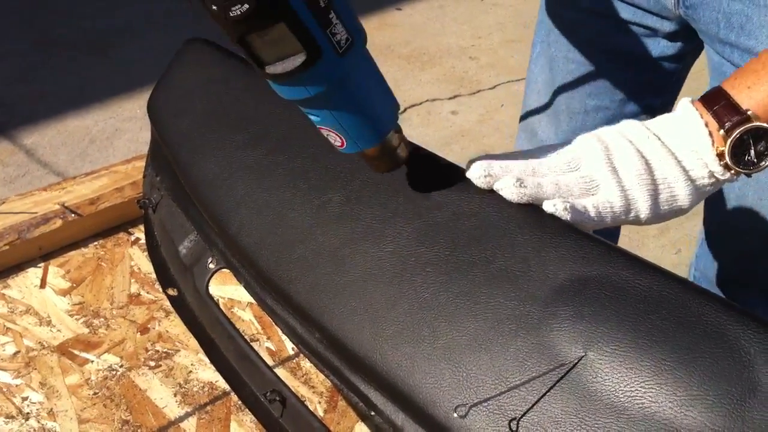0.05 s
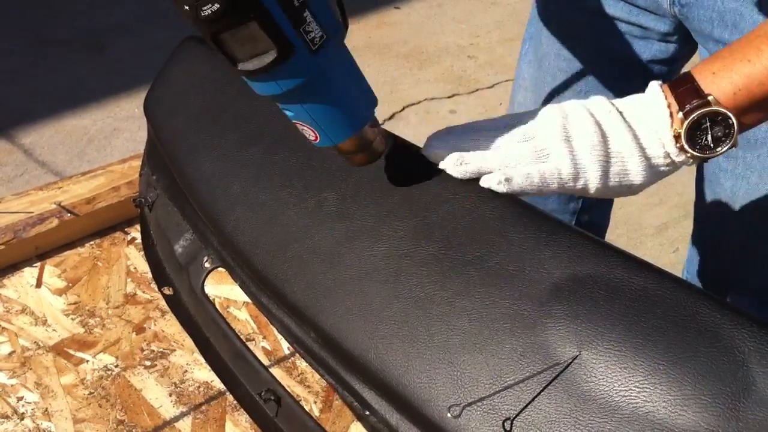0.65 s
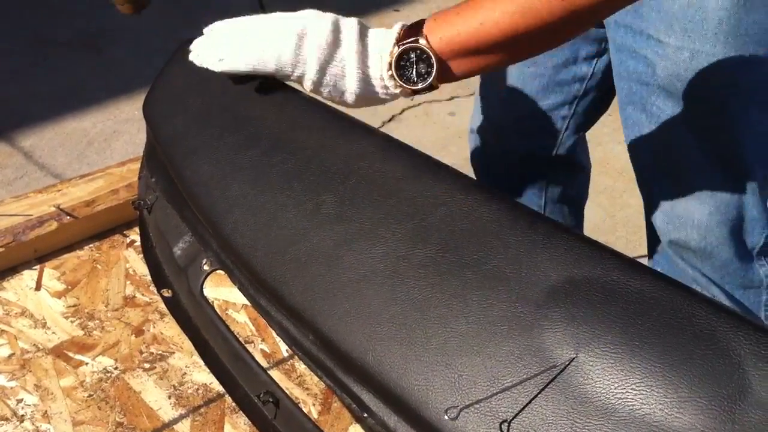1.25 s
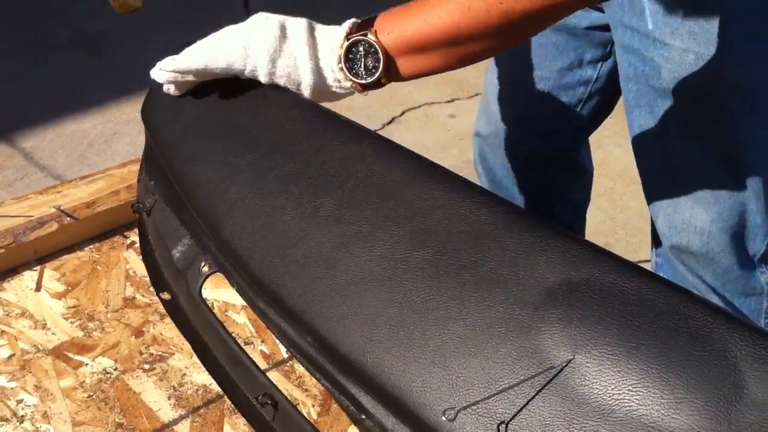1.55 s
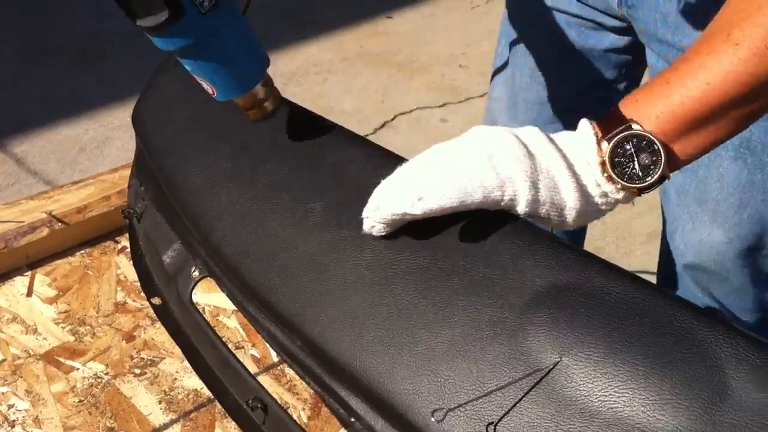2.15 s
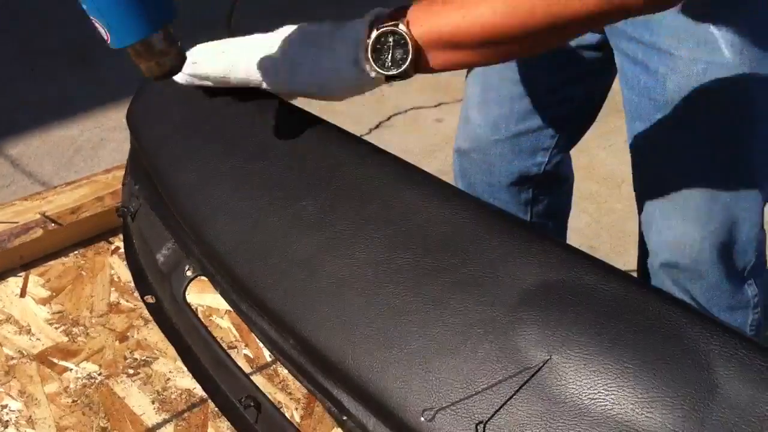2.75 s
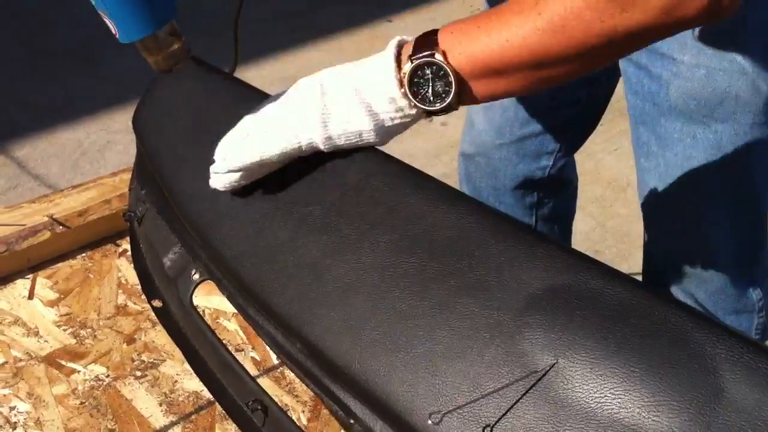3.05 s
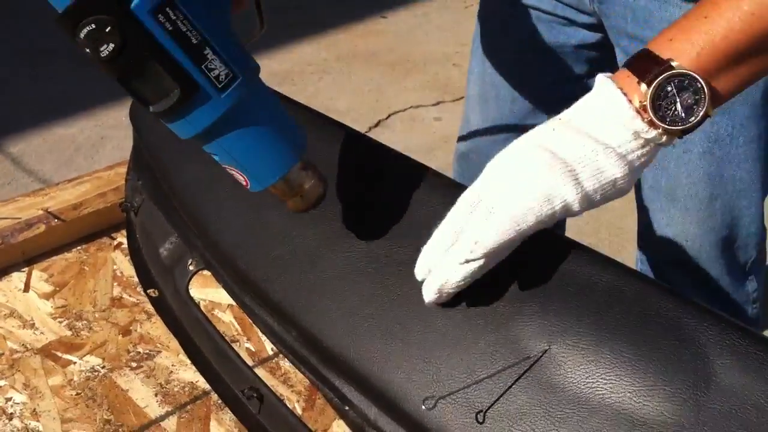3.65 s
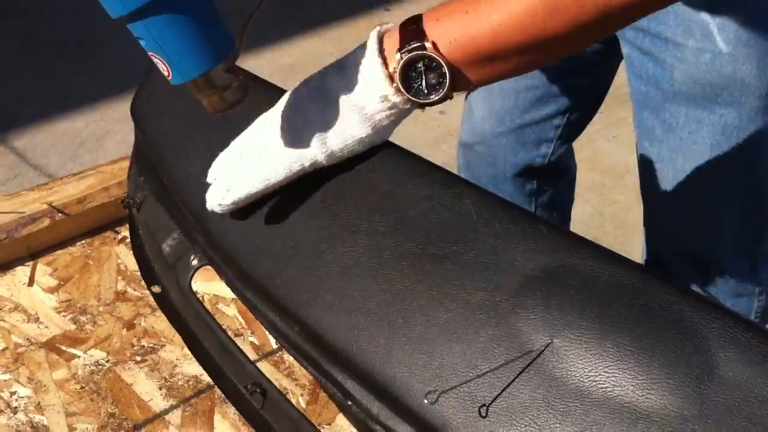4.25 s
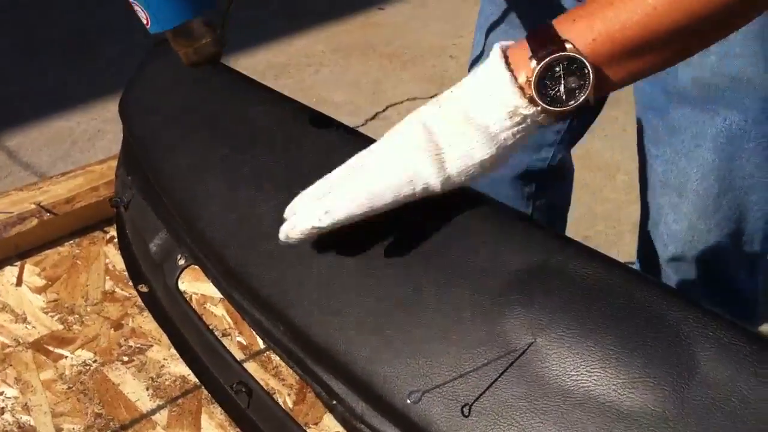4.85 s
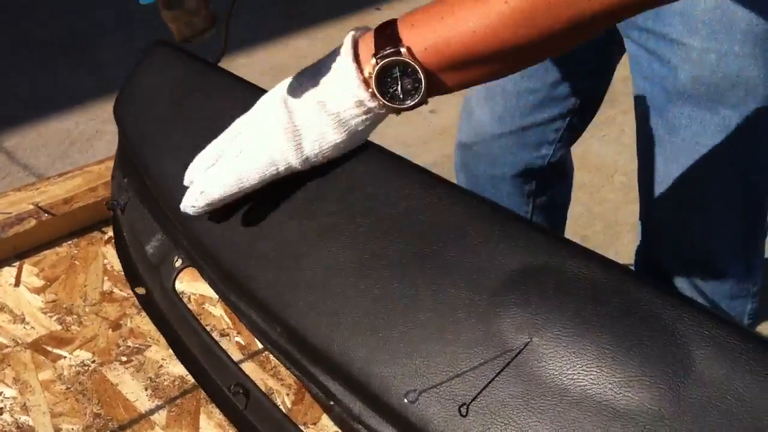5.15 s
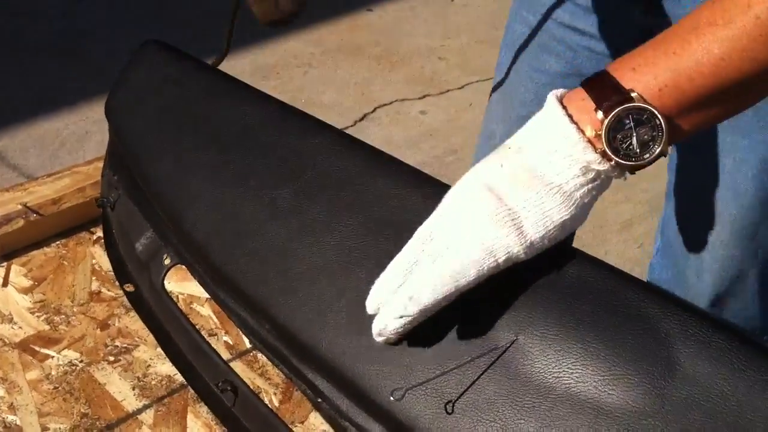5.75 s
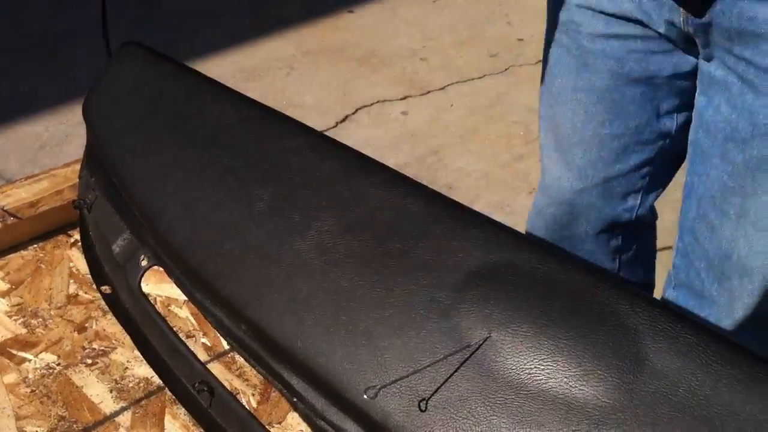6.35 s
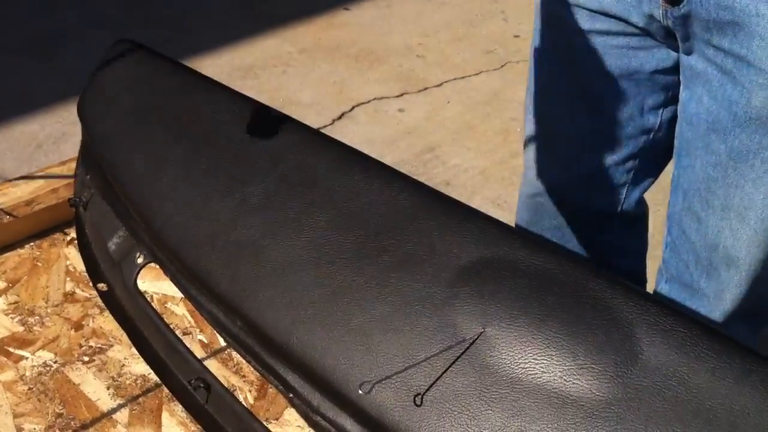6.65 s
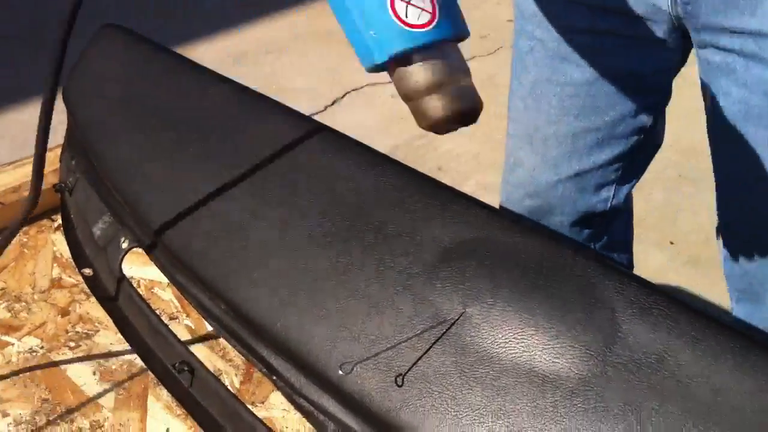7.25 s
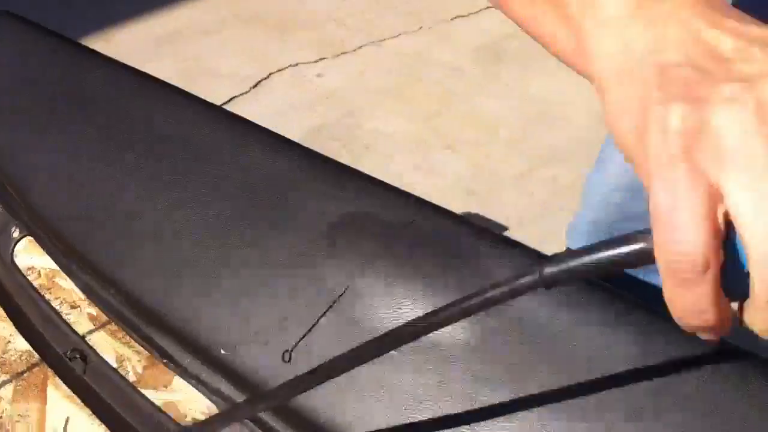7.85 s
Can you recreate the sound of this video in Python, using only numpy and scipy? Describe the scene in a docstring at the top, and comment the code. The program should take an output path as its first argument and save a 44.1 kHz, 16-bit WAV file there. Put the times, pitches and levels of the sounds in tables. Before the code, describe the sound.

A handheld electric heat gun runs close to the microphone, blowing a continuous hiss of air with a thin, wavering fan whine. The rush shifts gently in tone as it sweeps over a padded vinyl panel, above a faint outdoor rumble. Near the end it swings closer and gets louder, a brief rattling bump and small squeak come from the bench, and the airflow rises in pitch.

```python
"""An electric heat gun is swept over a padded vinyl panel, close up, over a low outdoor rumble.
At first the jet spatters off the panel's edge. Throughout, the fan whines and stirs the gun's cavities,
the nozzle hisses, and short echoes off nearby surfaces colour the moving rush. At 6.7 s the gun swings
closer; at 7.3 s something bumps the bench and squeaks. Last, a hand closes on the gun and the rush
rises in colour."""
import sys
import numpy as np
from scipy import signal
from scipy.fft import rfft, irfft, next_fast_len
from scipy.io import wavfile
from scipy.ndimage import uniform_filter1d, map_coordinates

SR = 44100
rng = np.random.default_rng(int(sys.argv[2]) if len(sys.argv) > 2 else 0)


def unload_wav(signal):
    """Save mono or channel-first audio to the path in sys.argv[1] as 16-bit WAV at rate SR, clipped to [-1, 1]."""
    wavfile.write(
        sys.argv[1],
        SR,
        np.round(np.clip(np.atleast_2d(signal).T, -1, 1) * 32767).astype(np.int16),
    )


N = 353241
TIME = np.arange(N) / SR
FREQ = np.maximum(np.fft.rfftfreq(next_fast_len(N, True), 1 / SR), 1)


def undb(db):
    """Decibels to gain."""
    return 10 ** (np.asarray(db) / 20)


def curves(table):
    """Each column of a timed table, at every sample."""
    times_s, *columns = np.transpose(table)
    return [np.interp(TIME, times_s, column) for column in columns]


def envelope(start_s, attack_s, hold_s, release_s):
    """Trapezoid, 0 to 1 and back; each *_ENV_S lists these four times."""
    return np.interp(TIME, start_s + np.cumsum([0, attack_s, hold_s, release_s]), [0, 1, 1, 0])


def walk(rate_hz):
    """Smoothed random steps, spread near 1."""
    step = max(int(SR / rate_hz), 1)
    held = np.repeat(rng.standard_normal(N // step + 1), step)
    return 4 / 3 * uniform_filter1d(uniform_filter1d(held, step), step)[:N]


def slope(points):
    """Spectral gain through (f/Hz, level/dB) points."""
    hz, db = np.transpose(points)
    return undb(np.interp(np.log(FREQ), np.log(hz), db))


def resonances(modes):
    """Spectral gain of steep-sided resonances; powers add."""
    gains = (undb(db) / (1 + ((FREQ - hz ** 2 / FREQ) / width_hz) ** 2) for hz, width_hz, db in modes)
    return np.sqrt(sum(gain ** 2 for gain in gains))


def noise(gain):
    """Turbulence of the given colour, rms 1."""
    white = rng.standard_normal(2 * (len(FREQ) - 1))
    coloured = irfft(rfft(white) * gain)[:N]
    return coloured / coloured.std()


def lowpass(x, hz):
    """Gentle zero-phase low-pass."""
    return signal.sosfiltfilt(signal.butter(2, hz, fs=SR, output="sos"), x)


def delayed(x, delay_ms):
    """Sound after a path of changing length."""
    return map_coordinates(x, [(TIME - delay_ms / 1000) * SR], order=3)


# rumble spectrum: f/Hz, relative level/dB
RUMBLE_SPECTRUM = [(20, -22), (40, -33), (62, -22), (85, -10), (100, -9.5), (125, -0.5), (165, 3.5),
                   (230, 1), (330, 0), (600, -12.5), (2000, -29), (16000, -36)]
# drone bands: f/Hz, width/Hz, relative level/dB
DRONE_BANDS = [(254, 16, -2), (393, 20, 0), (470, 20, -4)]
RUMBLE_SWELL_ENV_S = (3.3, 2, 0.49, 0.4)


def yard(rumble_db=-51.5, swell_db=3, waver_db=0.4, drone_db=-60):
    """Outdoor rumble with one slow swell and a faint unsteady drone."""
    level_db = rumble_db + swell_db * envelope(*RUMBLE_SWELL_ENV_S) + waver_db * walk(5)
    rumble = noise(slope(RUMBLE_SPECTRUM)) * undb(level_db)
    return rumble + noise(resonances(DRONE_BANDS)) * undb(drone_db)


# bump and rattle: t/s, relative level/dB, contact/ms
CONTACTS = [(7.304, -8, .4), (7.334, -2, 0.087), (7.337, 2.5, 0.083), (7.3413, 3.5, 0.5), (7.357, -2, 0.29),
            (7.367, 0.5, 0.6), (7.388, -4.5, 1.1), (7.406, -5, 1)]
# bench and panel modes: f/Hz, t60/s, relative level/dB
BENCH_MODES = [(134.4, 0.14, -9), (166, 0.13, -5.5), (245, 0.16, -7.5), (324, 0.074, -6), (407, 0.16, -7),
               (480, 0.09, -2.5), (570, 0.047, 2.5), (644, 0.026, 2), (790, 0.048, 0.5), (1062, 0.04, 4),
               (1200, 0.026, 4.5), (1500, 0.033, 1.5), (1850, 0.022, 4), (2300, 0.02, 1.5),
               (2850, 0.013, 8)]


def bump(ring_db=-28, scuff_db=-31, scuff_t60_s=0.07, scuff_hz=1800, low_cut_hz=110):
    """Each contact rings the bench and scuffs; longer contacts are duller."""
    t = np.arange(SR // 2) / SR
    out = np.zeros(N + 2 * len(t))
    for start_s, db, contact_ms in CONTACTS:
        weights = rng.uniform(.6, 1.4, len(BENCH_MODES))
        ring = 0
        for k, (hz, t60_s, mode_db) in enumerate(BENCH_MODES):
            decay = undb(mode_db - 60 * t / t60_s)
            ring = ring + (-1) ** k * weights[k] * decay * np.sin(2 * np.pi * hz * t)
        scuff = lowpass(rng.standard_normal(len(t)), scuff_hz) * undb(-60 * t / scuff_t60_s)
        response = undb(ring_db) * ring + undb(scuff_db) * scuff
        force = np.exp(-np.pi * 1000 * t / contact_ms)
        blow = signal.fftconvolve(response, force / force.sum())[:len(t)]
        start = int(start_s * SR)
        out[start:start + len(t)] += undb(db) * blow
    # deep bass is cut from the knocks
    return signal.sosfilt(signal.butter(4, low_cut_hz, "highpass", fs=SR, output="sos"), out[:N])


# slips: t/s, length/s, start f/Hz, middle f/Hz, end f/Hz, level/dB
SLIPS = [(7.3, 0.0346, 846, 1140, 1240, -32), (7.36, 0.075, 519, 410, 380, -36)]


def squeaks(roughness=0.0499, attack_share=0.14):
    """Something slips on the bumped panel: brief, uneven gliding tones."""
    out = 0
    for start_s, length_s, *glide_hz, db in SLIPS:
        progress = np.clip((TIME - start_s) / length_s, 0, 1)
        hz = np.interp(progress, [0, .5, 1], glide_hz) * (1 + roughness * walk(400))
        grip = np.minimum(progress / attack_share, 1) * np.sqrt(1 - progress)
        out = out + undb(db) * grip * np.sin(2 * np.pi * np.cumsum(hz) / SR)
    return np.sqrt(2) * out


# gap resonances: t/s, attack/s, hold/s, release/s, start f/Hz, rise/(Hz/s), width/Hz, level/dB
GAP_GLIDES = [(7.6, 0.22, .3, .1, 1300, 2150, 380, -40), (7.6, 0.3, .3, .1, 3400, 3000, 420, -42),
              (7.48, .06, .16, .07, 5200, 2300, 330, -43.5)]


def hand_gap():
    """Air rushes between hand and gun; the narrowing gap's resonances rise."""
    out = 0
    for start_s, *shape_s, start_hz, rise_hz_per_s, width_hz, db in GAP_GLIDES:
        hz = start_hz + rise_hz_per_s * np.maximum(TIME - start_s, 0)
        phase = 2 * np.pi * np.cumsum(hz) / SR
        band = 1 / (1 + (2 * FREQ / width_hz) ** 2)
        rush = noise(band) * np.cos(phase) + noise(band) * np.sin(phase)
        out = out + undb(db) * envelope(start_s, *shape_s) * rush
    return out


# air striking the panel: f/Hz, width/Hz, relative level/dB
SPLASH_BANDS = [(1680, 170, 9), (5160, 710, -3), (6320, 340, 1), (7200, 690, -1)]
SPLASH_ENV_S = (0.12, 0.2, 0.39, 0.16)


def splash(level_db=-39):
    """The jet spatters off the panel's edge with the nozzle held against it."""
    return noise(resonances(SPLASH_BANDS)) * undb(level_db) * envelope(*SPLASH_ENV_S)


# glove strokes toward the nozzle: t/s, half length/s, closeness/0-1
GLOVE_STROKES = [(2.706, 0.091, 1), (3.45, 0.44, 0.76), (3.85, 0.42, 0.76), (4.45, 0.27, 0.6),
                 (4.797, 0.22, 0.74), (5.53, 0.29, 0.76)]
GLOVE_ENV_S = (2.54, 0.16, 3.6, 1.25)


def glove_echo(x, far_ms=0.365, near_ms=0.27, near_share=0.35):
    """Each stroke shortens the echo's path and so strengthens it."""
    reach = sum(close * np.exp(-((TIME - at_s) / half_s) ** 2) for at_s, half_s, close in GLOVE_STROKES)
    delay_ms = far_ms + (near_ms - far_ms) * np.minimum(reach, 1)
    share = near_share * near_ms / delay_ms * envelope(*GLOVE_ENV_S)
    return share * delayed(x, delay_ms)


ARM_ENV_S = (7.4, 0.49, .6, .1)


def arm_echo(x, far_ms=0.588, near_ms=0.387, closing_ms_per_s=0.34, full_share=0.29, lag_turns=0.17):
    """Double bounce off the approaching arm; its roundness lags the phase each time."""
    elapsed_s = np.maximum(TIME - ARM_ENV_S[0], 0)
    delay_ms = np.maximum(far_ms - closing_ms_per_s * elapsed_s, near_ms)
    share = full_share * envelope(*ARM_ENV_S)
    analytic = signal.hilbert(x, next_fast_len(N))[:N]
    lag = np.exp(-2j * np.pi * lag_turns)
    return sum(share ** k * delayed((analytic * lag ** k).real, k * delay_ms) for k in (1, 2))


# panel reflection: t/s, delay/ms, share of direct sound
PANEL_PATH = [(0, 1.08, 0.12), (.75, 1.03, 0.15), (1, 0.77, 0.14), (1.25, 0.74, 0.23), (1.4, 0.74, .26),
              (1.8, 0.76, 0.25), (2.05, .8, .16), (2.25, 0.78, 0.07), (2.55, 1.04, 0.27), (2.8, 0.97, 0.1),
              (4.8, 1.04, 0.14), (5.15, 0.49, 0.092), (5.6, 0.43, 0.16), (5.95, 0.665, 0.38),
              (6.1, 0.59, .2), (6.33, 0.47, .22), (6.5, 0.74, 0.17), (7.1, 0.51, 0.056), (7.4, 0.84, 0.15),
              (7.7, 1.04, 0.072), (8, 1.63, 0.21)]


def reflections(rush, dull_hz=9500, body_ms=1.403, sway_ms=0.16, body_share=0.072):
    """Moving echoes off panel, swaying body, glove and arm: a gliding comb."""
    dulled = lowpass(rush, dull_hz)
    panel_ms, panel_share = curves(PANEL_PATH)
    panel = panel_share * delayed(dulled, panel_ms)
    body = body_share * delayed(dulled, body_ms + sway_ms * walk(3.3))
    return panel + body + glove_echo(dulled) + arm_echo(dulled)


# broadened fan-blade harmonics: f/Hz, width/Hz, relative level/dB
SWISH_BANDS = [(3720, 250, -2), (4780, 190, 1), (5800, 250, 1), (7060, 200, 6), (8660, 1300, -3),
               (9600, 250, 1), (10600, 900, -8), (11950, 700, -6), (12900, 700, -7), (14300, 600, -13)]
SWING_ENV_S = (6.74, 0.16, 0.17, 0.18)


def fan_swish(level_db=-39):
    """The fan's overtones, smeared into a breathy whistle as the gun swings past."""
    return noise(resonances(SWISH_BANDS)) * undb(level_db) * envelope(*SWING_ENV_S)


def lifted():
    """0 to 1 as the swing lifts the gun off the panel; it then stays closer."""
    start_s, attack_s = SWING_ENV_S[:2]
    return np.clip((TIME - start_s) / attack_s, 0, 1)


# motor lines: multiple of shaft speed
MOTOR_ORDERS = [1, 2, 3, 5, 7, 12, 35, 40]
# per motor line: level/dB before trim
MOTOR_DB = [-57.5, -63, -52.5, -51.5, -60, -57, -71, -72]
# blade whine as the intake turns: t/s, level/dB before trim
WHINE_DB = [(0, -46), (.7, -45.5), (1.05, -48), (1.35, -54), (2.2, -48.5), (2.5, -50), (2.72, -43),
            (3, -54), (3.15, -48), (3.4, -54), (4.25, -43.5), (4.7, -48.5), (5, -49), (5.3, -44.5),
            (5.75, -53.5), (6.03, -41.5), (6.25, -50), (6.6, -52), (7, -43.5), (7.2, -53), (7.4, -39.5),
            (7.55, -50), (7.67, -42), (7.8, -50), (8, -46)]
# whine overtones: multiple of shaft speed, relative level/dB
WHINE_OVERTONES = [(16, 0), (24, -6), (32, -15)]
# overtones' narrower beam: t/s, level/dB before trim
OVERTONE_DB = [(0, -49), (.3, -53), (.88, -49), (1.15, -52), (1.55, -53), (2, -56), (2.45, -48),
               (3.05, -50), (3.4, -58), (4.1, -46), (5, -54), (6.25, -53), (6.55, -56), (7.15, -45.5),
               (7.45, -52), (7.7, -55), (7.88, -48)]


def rotor(shaft_hz=298.5, blades=8, whine_trim_db=-2, overtone_trim_db=-1.5, motor_trim_db=-3.5,
          lift_db=5, beam_db=0.8, flicker_db=2, fade_db=2.5):
    """Shaft-locked tones: blade-pass whine and weaker motor lines."""
    # turbulent load: drift, wander, tremble
    speed_hz = shaft_hz * (1 + 0.0005 * walk(2) + 0.00075 * walk(25) + 0.002 * walk(200))
    turns = np.cumsum(speed_hz) / SR
    whine_db = curves(WHINE_DB)[0] + whine_trim_db
    overtone_db = curves(OVERTONE_DB)[0] + overtone_trim_db
    motor_gain_db = motor_trim_db + lift_db * lifted()
    whine = [(blades, whine_db)] + [(k, db + overtone_db) for k, db in WHINE_OVERTONES]
    lines = [(k, db + beam_db * walk(3.65) + flicker_db * walk(30)) for k, db in whine]
    lines += [(k, db + motor_gain_db + fade_db * walk(6)) for k, db in zip(MOTOR_ORDERS, MOTOR_DB)]
    return np.sqrt(2) * sum(undb(db) * np.sin(2 * np.pi * (k * turns + rng.random())) for k, db in lines)


# jet turbulence: f/Hz, relative level/dB
JET_SPECTRUM = [(100, -31), (300, -8), (600, -1), (1300, 3), (1870, -3.5), (2400, 2.5), (2750, 0),
                (3300, 2.5), (4500, -2), (5000, -0.5), (5400, 2.5), (6200, -1), (6800, -4.5), (7900, -1.5),
                (9800, -6.5), (12500, -4.5), (15800, -18.5)]
# gun swept nearer and farther, also sets the housing: t/s, level/dB before trim
SWEEP_DB = [(0, -36), (.55, -33.5), (.9, -35.5), (1.35, -43), (1.95, -39), (2.55, -36), (2.85, -39.5),
            (3.3, -39.5), (3.8, -36), (4.05, -40.5), (4.35, -36.5), (4.65, -39.5), (6.05, -39.5),
            (6.6, -42), (7.05, -37.5), (7.4, -36), (7.65, -37), (8, -34.5)]


def jet(base_db=-39.5, follow_db_per_db=0.13, swing_db=3.5, lift_db=3, flicker_db=0.6):
    """Turbulent hiss; follows the sweep slightly and rises as the gun swings closer."""
    sweep_db, = curves(SWEEP_DB)
    level_db = base_db + follow_db_per_db * (sweep_db - np.median(sweep_db))
    level_db += swing_db * envelope(*SWING_ENV_S) + lift_db * lifted()
    return noise(slope(JET_SPECTRUM)) * undb(level_db + flicker_db * walk(50))


# resonances of the gun's parts: f/Hz, width/Hz, relative level/dB
HOUSING_MODES = [(591, 172, -4.5), (997, 397, 1.25), (1566, 440, -2.5), (2460, 300, -19.5)]
HOLLOW_MODES = [(2086, 295, 0)]
NOZZLE_MODES = [(3360, 280, -0.5), (3703, 390, 8.5)]
VENT_MODES = [(4275, 610, 0)]
SLOT_MODES = [(4740, 610, 0)]
GRILLE_MODES = [(5450, 420, -6), (5820, 310, 0)]
# each part as the gun turns: t/s, level/dB before trim
HOLLOW_DB = [(0, -44), (.6, -41), (1.2, -47.5), (1.65, -55), (2.1, -45.5), (2.45, -43.5), (2.75, -48.5),
             (3, -43), (3.4, -52.5), (3.85, -48), (4.35, -42), (4.85, -62), (5.13, -41.5), (5.5, -53),
             (5.9, -43), (6.6, -53), (7, -39.5), (7.25, -45), (7.5, -38.5), (7.7, -47), (7.82, -45),
             (8, -43)]
NOZZLE_DB = [(0, -42), (.5, -55), (.95, -43), (1.3, -40), (1.58, -57), (1.95, -56), (2.2, -42.5),
             (2.5, -46.5), (2.73, -40), (3, -44), (3.2, -48), (3.45, -44), (3.7, -51), (3.95, -40.5),
             (4.35, -42), (4.6, -51), (4.78, -40), (4.92, -40), (5.05, -44.5), (5.3, -45.5), (5.62, -43.5),
             (6.1, -44.5), (6.6, -45), (7.15, -41.5), (7.4, -44), (7.72, -45), (8, -46)]
VENT_DB = [(0, -41), (.4, -44), (1.3, -55), (1.7, -45), (2.1, -54), (2.4, -46.5), (2.72, -44.5),
           (3.05, -42), (3.22, -54), (3.5, -40.5), (3.85, -39.5), (4.2, -43.5), (4.6, -51), (4.82, -40.5),
           (5, -44), (5.22, -41), (5.36, -46), (5.55, -41), (5.83, -47), (5.96, -41), (6.25, -48.5),
           (7, -48), (7.32, -36), (7.6, -46), (7.88, -44), (8, -44)]
SLOT_DB = [(0, -59), (.85, -46), (1.15, -54), (1.7, -50), (2.05, -60), (2.45, -41.5), (2.8, -50),
           (3.1, -45), (3.5, -52), (4.1, -42), (4.6, -49), (5.3, -54), (6.3, -54), (6.6, -65), (7.15, -40),
           (7.35, -43), (7.72, -57), (7.9, -50), (8, -48)]
GRILLE_DB = [(0, -48), (.8, -49), (.95, -44.5), (1.2, -46.5), (1.7, -41), (2, -50), (2.4, -48),
             (2.85, -44.5), (3.08, -41), (3.35, -45), (3.7, -40), (4.15, -42), (4.6, -41.5), (5, -46),
             (5.8, -56), (6.7, -44.5), (7.08, -37), (7.26, -47), (7.42, -35.5), (7.55, -51), (7.85, -47),
             (8, -35)]


def cavities(eddy_db=0.95):
    """The fan's wake rings the gun's cavities, each beamed its own way; eddies make them flicker."""
    parts = [(HOUSING_MODES, SWEEP_DB, -0.71), (HOLLOW_MODES, HOLLOW_DB, -1),
             (NOZZLE_MODES, NOZZLE_DB, -2), (VENT_MODES, VENT_DB, -0.76),
             (SLOT_MODES, SLOT_DB, -1), (GRILLE_MODES, GRILLE_DB, -3)]
    return sum(noise(resonances(modes)) * undb(curves(track_db)[0] + trim_db + eddy_db * walk(25))
               for modes, track_db, trim_db in parts)


def scene():
    """One microphone, same in both channels."""
    rush = cavities() + jet() + fan_swish()
    mix = rush + reflections(rush) + splash() + rotor() + bump() + squeaks() + yard() + hand_gap()
    return np.tile(mix, (2, 1))


def record(dry, top_hz=15800):
    """Steep treble cut."""
    return signal.sosfilt(signal.ellip(10, .2, 70, top_hz, fs=SR, output="sos"), dry)


dry = scene()
out = record(dry)
unload_wav(out)
```